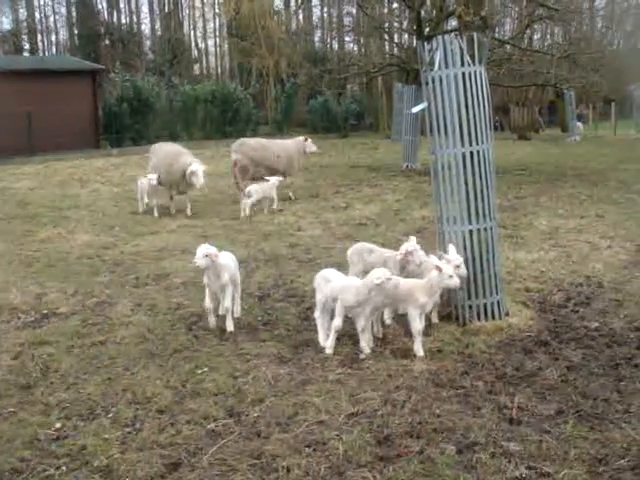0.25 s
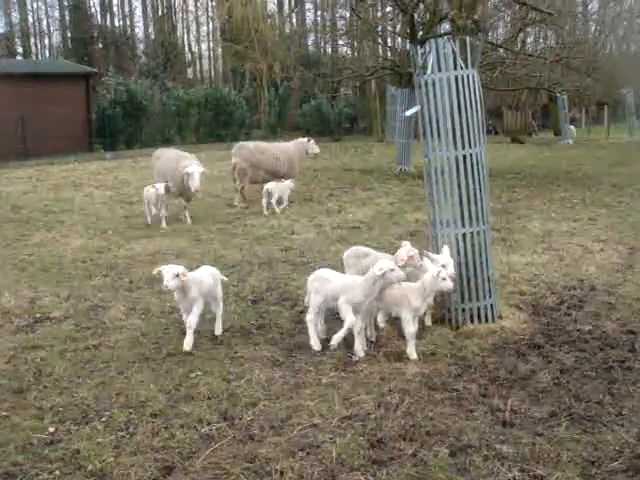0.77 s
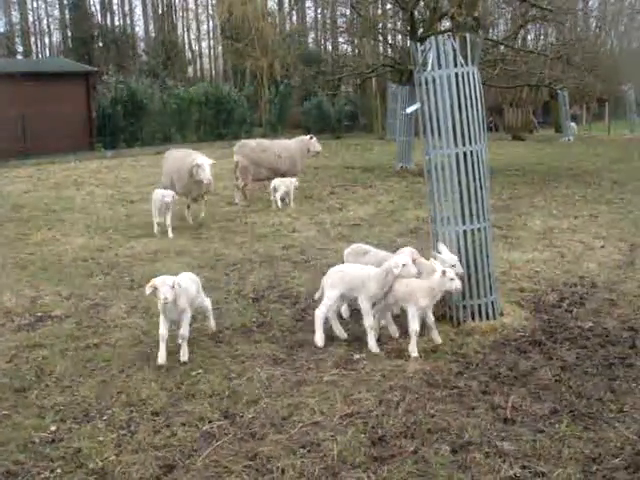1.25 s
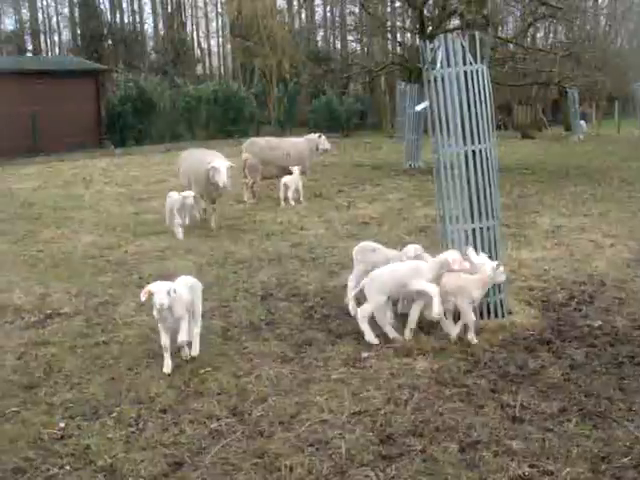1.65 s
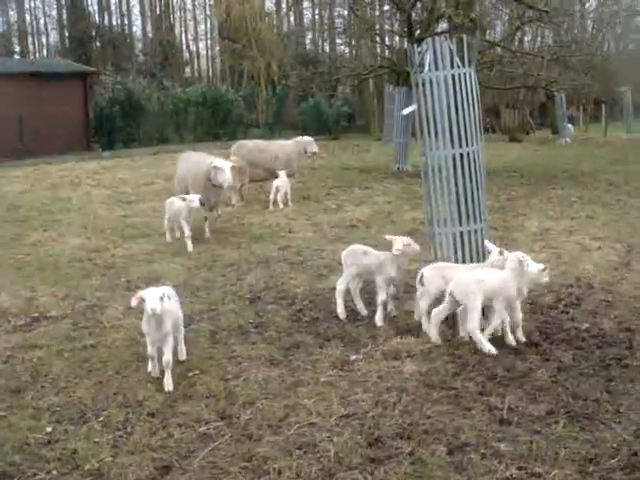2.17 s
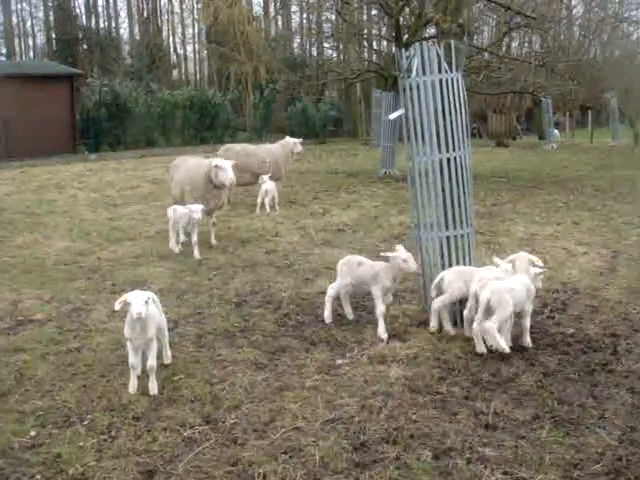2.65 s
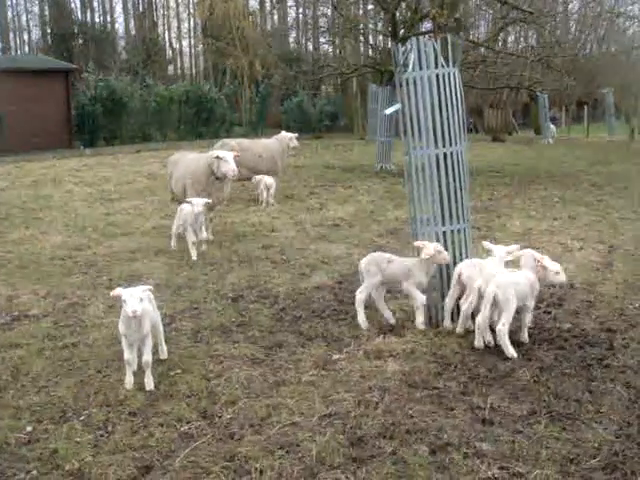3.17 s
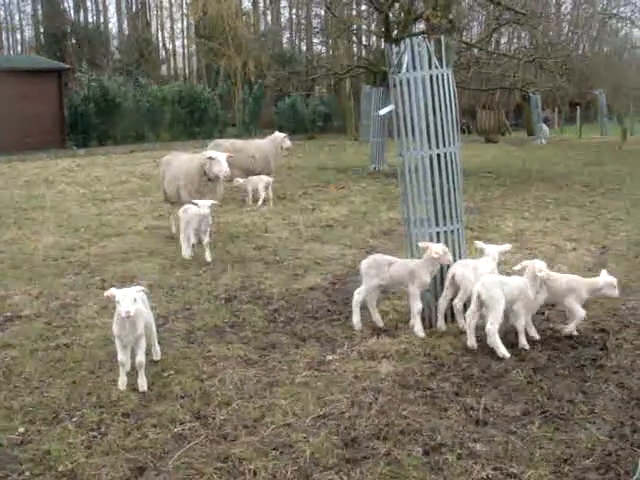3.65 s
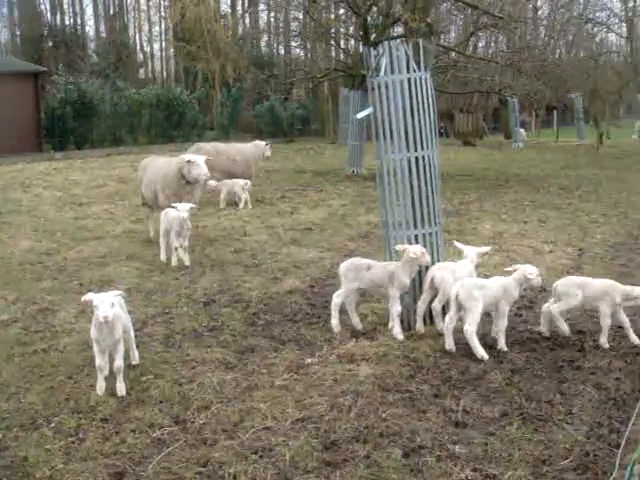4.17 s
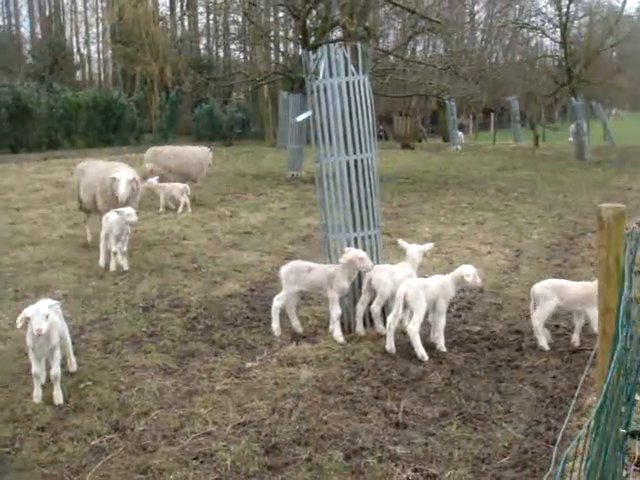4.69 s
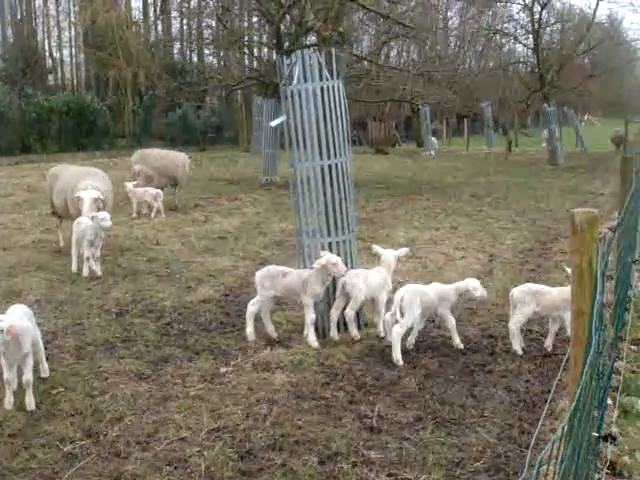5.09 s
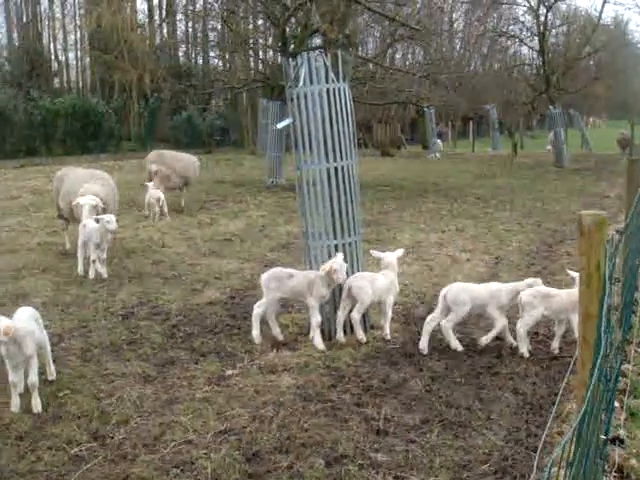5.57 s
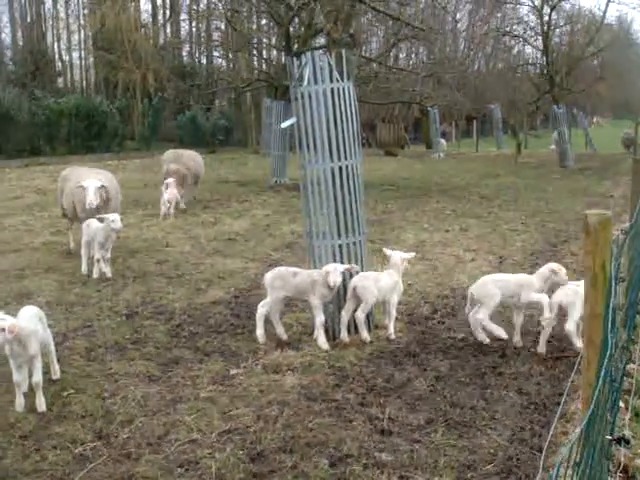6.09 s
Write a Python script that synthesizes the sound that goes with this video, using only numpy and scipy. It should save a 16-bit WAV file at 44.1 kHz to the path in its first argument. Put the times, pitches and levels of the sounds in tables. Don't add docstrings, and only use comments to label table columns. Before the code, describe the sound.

In an open grassy paddock, far traffic roars steadily under constant hiss and light wind bumping the microphone. A fast bird twitter opens, followed by clear whistles, chirps and thin buzzing high notes. A twig snaps and grass rustles faintly. After a quieter stretch, a lamb gives one short, hoarse bleat that rises, falls and echoes off sheds and trees.

```python
import sys
import numpy as np
from scipy import signal
from scipy.io import wavfile
from scipy.ndimage import uniform_filter1d, minimum_filter1d

SR = 44100
rng = np.random.default_rng(int(sys.argv[2]) if len(sys.argv) > 2 else 0)


def gain_from_db(level_db):
    decades = np.asarray(level_db, float) / 20
    return 10 ** decades


def generate_wav(signal):
    frames = np.transpose(np.atleast_2d(signal))
    scaled = np.clip(frames, -1, 1) * 32767
    pcm = np.round(scaled).astype(np.int16)
    wavfile.write(sys.argv[1], SR, pcm)


N = 279594


def rms_one(x):
    return x / np.sqrt(np.mean(x ** 2) + 1e-20)


def span(start, stop):
    at = np.arange(max(int(start * SR), 0), min(int(stop * SR), N))
    return at, at / SR


def drift(rate):
    r = np.exp(-2 * np.pi * rate / SR)
    return rms_one(signal.lfilter([1], [1, -2 * r, r * r], rng.standard_normal(N + SR))[SR:])


def bandpass(x, order, low_hz, high_hz):
    return signal.sosfilt(signal.butter(order, [low_hz, high_hz], "band", fs=SR, output="sos"), x)


def tone(pitch_hz):
    return np.sin(2 * np.pi * np.cumsum(pitch_hz) / SR)


def resonance(x, hz, width_hz):
    r = np.exp(-np.pi * width_hz / SR)
    return signal.lfilter(np.array([1, 0, -1]) * (1 - r * r) / 2, [1, -2 * r * np.cos(2 * np.pi * hz / SR), r * r], x)


def banded_noise(spectrum, patchy_db):
    hz, level_db = np.transpose(spectrum)
    edges = hz[0] * 2 ** np.arange(0, np.log2(hz[-1] / hz[0]) + 1 / 3, 1 / 3)
    edges = edges[edges < SR / 3]
    white, out = rng.standard_normal((2, N)), np.zeros(N)
    knots = np.arange(0, N + SR, SR // 4)
    wander = rng.standard_normal((40, len(knots)))
    for k, (low, high) in enumerate(zip(edges, edges[1:])):
        band = bandpass(white[k % 2], 2, low, high)
        centre_db = np.interp(np.log(low * high) / 2, np.log(hz), level_db)
        out += band * gain_from_db(centre_db + patchy_db * np.interp(np.arange(N), knots, wander[k]))
    return rms_one(out)


def paddock(x, echoes, echo_cut_hz, scatter_db, t60):
    t = np.arange(SR) / SR
    tail = rng.standard_normal(SR) * gain_from_db(-60 * t / t60) * np.minimum(t / 0.16, 1)
    response = gain_from_db(scatter_db) * tail / np.sqrt(np.sum(tail ** 2))
    bright_hz, width_hz = 1300, 1300
    response += gain_from_db(15) * resonance(resonance(response, bright_hz, width_hz), bright_hz, width_hz)
    walls = np.zeros(SR)
    for delay, level_db in echoes:
        walls[int(delay * SR)] = gain_from_db(level_db)
    response += signal.lfilter(*signal.butter(2, echo_cut_hz, fs=SR), walls)
    return x + signal.fftconvolve(x, response)[:N]


def hiss():
    # (frequency [Hz], density [dB per Hz])
    hiss_curve = [(1300, -31.5), (2200, -1), (3500, 0.5), (5000, 0.5), (7000, 0.5), (9000, 1),
                  (10500, -9.5), (14000, -16)]
    return gain_from_db(-58.5) * banded_noise(hiss_curve, patchy_db=1.16)


def traffic():
    # (frequency [Hz], density [dB per Hz])
    road_curve = [(35, -62), (60, -26), (141, -16.5), (177, -12.5), (298, -9), (329, -12.5), (401, -11),
                  (488, -6.5), (710, 0), (954, -1.5), (1840, -19), (3000, -57), (3900, -60), (6600, -120)]
    # (time [s], level [dB], tyre peak [Hz], tyre peak level [dB])
    passing = [
        (0, -41.5, 886, -8),
        (1.2, -41.5, 850, -3.5),
        (2.4, -42.5, 740, -8.5),
        (3.1, -43.5, 684, 1.5),
        (3.9, -42, 796, -6.5),
        (5.0, -42.5, 824, -5.5),
        (6.34, -42, 845, -9),
    ]
    s, *columns = np.transpose(passing)
    road_db, peak_hz, peak_db = (np.interp(np.arange(N) / SR, s, c) for c in columns)
    road, low_hz, high_hz = banded_noise(road_curve, patchy_db=1.56), 650, 880
    high = np.clip((peak_hz - low_hz) / (high_hz - low_hz), 0, 1)
    tyres = (1 - high) * resonance(road, low_hz, 360) + high * resonance(road, high_hz, 240)
    return gain_from_db(road_db - 1.27) * (road + gain_from_db(peak_db + 0.88 * drift(2.5)) * tyres)


def wind():
    # (middle [s], length [s], level [dB])
    gusts = [
        (.01, .08, -56),
        (0.29, 0.67, -60.5),
        (0.764, 0.26, -57),
        (1.08, 0.14, -60),
        (1.285, .09, -52),
        (2.144, 0.17, -52),
        (2.347, 0.52, -57.5),
        (3.546, 0.28, -65),
        (5.5, .16, -53.5),
    ]
    breeze_db = -70.5
    t = np.arange(N) / SR
    strength = gain_from_db(breeze_db) + sum(gain_from_db(db) * np.exp(-(3 * (t - s) / length) ** 2) for s, length, db in gusts)
    low = bandpass(rng.standard_normal(N), 2, 52, 130)
    return strength * gain_from_db(-7.0) * rms_one(low * gain_from_db(1.5 * drift(8.6)))


def rustle():
    # (start [s], length [s], low edge [Hz], high edge [Hz], level [dB])
    puffs = [
        (1.397, .07, 2500, 9800, -53.5),
        (1.71, .01, 3700, 4500, -60),
        (1.78, .01, 3800, 4500, -63),
        (1.84, .01, 3700, 4500, -63),
        (1.912, .01, 3800, 4500, -65),
        (2.035, .02, 3700, 5300, -46),
        (3.29, .015, 3000, 4600, -48),
    ]
    out, noise = np.zeros(N), rng.standard_normal(N)
    for start, length, low_hz, high_hz, level_db in puffs:
        at, t = span(start, start + length)
        out[at] += gain_from_db(level_db) * np.hanning(len(at)) * bandpass(noise[at], 2, low_hz, high_hz)
    return out


def song():
    # (start [s], length [s], pitch [Hz], level [dB], lead note [dB])
    verses = [
        (0.408, .12, 7250, -55.5, -3),
        (0.584, .105, 7170, -53.5, 0),
        (0.718, .12, 7150, -56.5, -17),
        (0.897, .16, 7000, -58, -13),
        (3.875, 0.15, 7300, -60, -4),
        (4.053, .14, 7160, -61, 2),
        (4.234, .13, 7100, -62, 3),
        (4.372, .17, 6970, -66, -6),
    ]
    lead_note = (0, .25, 1.04, 1.065)
    falling_notes = [(.2, .35, 1.035, 1.003), (.5, .5, 1.003, .985)]
    for start, length, hz, level_db, lead_db in verses:
        for (at, share, first, last), db in zip([lead_note, *falling_notes], [lead_db, 0, 0]):
            yield start + at * length, share * length, first * hz, last * hz, level_db + db


def thin_notes():
    # (start [s], length [s], first pitch [Hz], last pitch [Hz], level [dB])
    lone_glides = [(0, 0.044, 3330, 3170, -58), (0.044, 0.026, 4500, 4430, -58),
                   (0.656, .2, 3380, 3340, -65.5), (0.69, 0.021, 5150, 5400, -65),
                   (1.53, .045, 8600, 8350, -61), (1.666, 0.13, 8750, 8000, -65),
                   (3.282, 0.15, 8850, 8740, -72), (3.444, 0.058, 8800, 8500, -70),
                   (3.706, 0.063, 5300, 6270, -65), (3.74, .045, 6200, 6100, -67),
                   (3.883, .071, 5600, 6000, -63.5), (4.12, .06, 8800, 8360, -66),
                   (4.29, .17, 8600, 7400, -65), (5.1, 0.074, 5450, 5400, -64),
                   (5.195, .069, 5450, 5250, -67)]
    out, shake, flutter = np.zeros(N), drift(170), gain_from_db(2.8 * drift(130))
    for start, length, first_hz, last_hz, level_db in [*song(), *lone_glides]:
        at, t = span(start, start + length)
        pitch = np.linspace(first_hz, last_hz, len(at)) * (1 + 0.013 * shake[at])
        shape = signal.windows.tukey(len(at), .5) * flutter[at]
        out[at] += np.sqrt(2) * gain_from_db(level_db) * shape * tone(pitch)
    return out


def chirp_notes():
    # (top time [s], top pitch [Hz], level [dB], rise [s], fall [s])
    chirps = [
        (.73, 3750, -50, .03, .058),
        (2.262, 3750, -50, .03, .062),
        (3.76, 3600, -49, .05, .05),
        (.76, 4230, -60, .012, .015),
        (3.77, 4380, -61, .018, .028),
    ]
    bend_hz_per_s2, depth_hz, rise_db, fall_db = 360000, 680, -17, -13
    for top, hz, level_db, rise, fall in chirps:
        s = np.linspace(-rise, fall, num=24)
        fade_db = np.where(s < 0, rise_db * (s / rise) ** 2, fall_db * (s / fall) ** 2)
        yield top + s, hz - np.minimum(bend_hz_per_s2 * s ** 2, depth_hz), level_db + fade_db


def held_notes():
    # (start [s], length [s], first pitch [Hz], held pitch [Hz], level [dB])
    held = [
        (.475, 0.19, 3900, 3410, -47.5),
        (.44, 0.22, 3550, 3990, -52.5),
    ]
    settle_s, attack_s, release_s = 0.0202, 0.019, .055
    sag_hz_per_s, swell_db = 460, 5
    for start, length, first_hz, held_hz, level_db in held:
        s = np.linspace(0, length, num=40)
        pitch = held_hz + (first_hz - held_hz) * np.exp(-s / settle_s) - sag_hz_per_s * s
        edges_db = -22 * np.maximum(np.maximum(1 - s / attack_s, 1 - (length - s) / release_s), 0)
        below_db = swell_db * np.maximum(1 - s / (length - release_s), 0)
        yield start + s, pitch, level_db + edges_db - below_db


def whistles():
    out = np.zeros(N)
    for s, hz, level_db in [*chirp_notes(), *held_notes()]:
        flutter = gain_from_db(3 * drift(70))
        at, t = span(s[0], s[-1])
        smooth_hz = uniform_filter1d(np.interp(t, s, hz), size=400, mode="nearest")
        pitch = smooth_hz * (1 + 0.0072 * drift(110)[at])
        edge = signal.windows.tukey(len(at), .1)
        out[at] += np.sqrt(2) * gain_from_db(np.interp(t, s, level_db)) * edge * flutter[at] * tone(pitch)
    return out


def chips():
    # (time [s], peak level [dB], centre [Hz], grace chip [dB])
    beats = [(.001, -37.5, 3400, -8), (.031, -41, 3770, 2.5), (.0692, -40, 4500, -10), (.091, -39, 3990, 2),
             (.116, -28.5, 3730, -22), (0.1502, -38.5, 3760, 4), (.1774, -43, 3180, -11),
             (.211, -44, 4030, -5), (.2379, -36, 3630, -8), (0.272, -33.5, 3720, -23),
             (.3047, -41, 3610, -12), (.398, -38.5, 3380, -22)]
    grace_s, grace_ratio = .0035, 1.2
    after_s, after_ratio, after_db = .019, 1.04, -9
    for s, db, hz, grace_db in beats:
        yield s, db, hz
        yield s - grace_s, db + grace_db, hz * grace_ratio
        yield s + after_s, db + after_db, hz * after_ratio


def twitter():
    out, shake = np.zeros(N), drift(300)
    for start, peak_db, hz in chips():
        at, t = span(start - .0015, max(start + 0.0077, .002))
        pitch = hz * (np.geomspace(1.13, .91, len(at)) + 0.038 * shake[at])
        out[at] += gain_from_db(peak_db - 6.0) * np.hanning(len(at)) * tone(pitch)
    return out


def call():
    # (time [s], pitch [Hz], effort [dB])
    effort = [
        (5.415, 389.5, -47),
        (5.451, 412.5, -31.5),
        (5.476, 430.2, -25.5),
        (5.49, 469.6, -19),
        (5.505, 462, -20.5),
        (5.529, 450.5, -25),
        (5.559, 422.4, -29),
        (5.6, 370, -50.5),
    ]
    # (centre [Hz], width [Hz], level [dB])
    throat = [(370, 75, 3.5), (462, 182, -1), (754, 68, -0.5)]
    # (centre [Hz], width [Hz], level [dB], lag [s])
    mouth = [(1000, 380, -25, 0.02), (1263, 266, -8.5, 0.0043), (1456, 320, -12.5, -0.0093),
             (2080, 210, -16, -0.00037), (2620, 120, -22, 0.025), (3400, 140, -33, 0.012),
             (4800, 220, -37.5, 0.018), (5450, 960, -31.5, 0.044)]
    s, pitch, level_db = np.transpose(effort)
    at, t = span(s[0], s[-1] + 0.04)
    effort_db = np.interp(t, s, level_db)
    rough = np.clip(.28 + .035 * (-21 - effort_db), 0, 1)
    cycles = np.cumsum(np.interp(t, s, pitch) * (1 + 0.0614 * rough * drift(117)[at])) / SR
    harmonics = np.arange(1, 9)[:, None]
    pulses = rms_one(np.sum(np.cos(2 * np.pi * harmonics * cycles) * gain_from_db(-5.0 * harmonics), axis=0))
    breath = rng.standard_normal(len(at)) * (1 + 2.6 * np.cos(2 * np.pi * cycles))
    source = (1 - rough) * pulses + 4 * rough * breath
    low = sum((-1) ** k * gain_from_db(db) * resonance(source, hz, wide) for k, (hz, wide, db) in enumerate(throat))
    low = bandpass(low, 6, 315, 1000)
    low /= np.sqrt(uniform_filter1d(low ** 2, size=700) + 1e-9)
    out = np.zeros(N)
    out[at] = low * gain_from_db(effort_db)
    rasp = pulses + 1.6 * breath
    jaw_shuts_s, jaw_db_per_s = 5.522, -220
    mouth_db = level_db + 2 + jaw_db_per_s * np.maximum(s - jaw_shuts_s, 0)
    for hz, wide, db, lag in mouth:
        cavity = rms_one(resonance(resonance(rasp, hz, wide), hz, wide))
        cavity /= np.sqrt(uniform_filter1d(cavity ** 2, size=900))
        out[at] += cavity * gain_from_db(db - 6.5 + np.interp(t - lag, s, mouth_db, left=-90))
    return out


def scene():
    # (delay [s], level [dB])
    shed_echoes = [(.068, -11), (.115, -21), (.165, -27), (.222, -22)]
    # (delay [s], level [dB])
    bird_echoes = [(.031, -18), (.062, -16)]
    bed = traffic() + hiss() + wind() + rustle()
    birds = paddock(whistles() + thin_notes(), bird_echoes, echo_cut_hz=6000, scatter_db=-7, t60=.42)
    hedge = paddock(twitter(), bird_echoes, echo_cut_hz=12000, scatter_db=-3, t60=0.36)
    caller = paddock(call(), shed_echoes, echo_cut_hz=1100, scatter_db=-19, t60=.8)
    return (bed + birds + hedge + caller)[None]


def camera_gaps(x):
    short_share, long_share, gap_db = .032, .0025, -40
    hz, s, cells = signal.stft(x, SR, nperseg=256, noverlap=192)
    clumps = gain_from_db(4.0 * drift(8)[np.minimum((s * SR).astype(int), N - 1)])
    chance = rng.random((2, len(hz) // 3 + 1, len(s)))
    short = minimum_filter1d(chance[0], size=4, axis=1) < short_share * clumps
    long = minimum_filter1d(chance[1], size=11, axis=1) < long_share * clumps
    dropped = np.repeat(short | long, 3, axis=0)[:len(hz)] & (hz[:, None] > 4600)
    quiet = 1.6 * np.median(np.abs(cells[0, (hz > 5000) & (hz < 9500)]))
    dropped &= uniform_filter1d(np.abs(cells[0]), size=5, axis=0) < quiet
    gapped = cells * np.where(dropped, gain_from_db(gap_db), 1)
    return signal.istft(gapped, SR, nperseg=256, noverlap=192)[1][:, :N]


def top_cut(x):
    return signal.sosfilt(signal.butter(12, 10050, fs=SR, output="sos"), x)


def record(dry):
    steep_cut = signal.ellip(12, .3, 60, 10080, fs=SR, output="sos")
    mix = signal.sosfilt(steep_cut, camera_gaps(dry))
    return top_cut(mix)


dry = scene()
out = record(dry)
generate_wav(out)
```